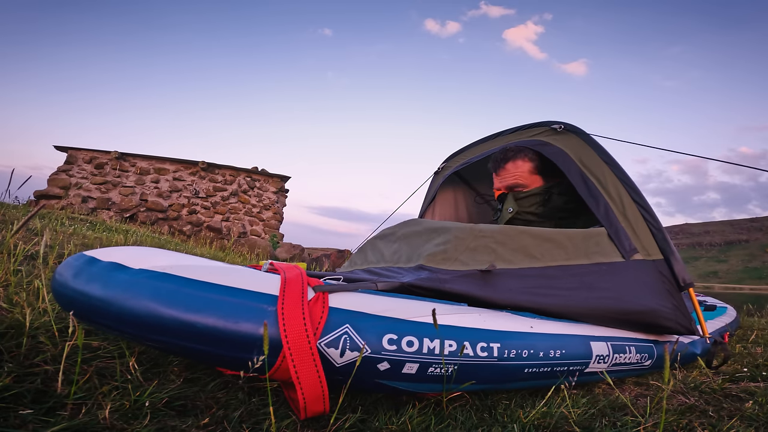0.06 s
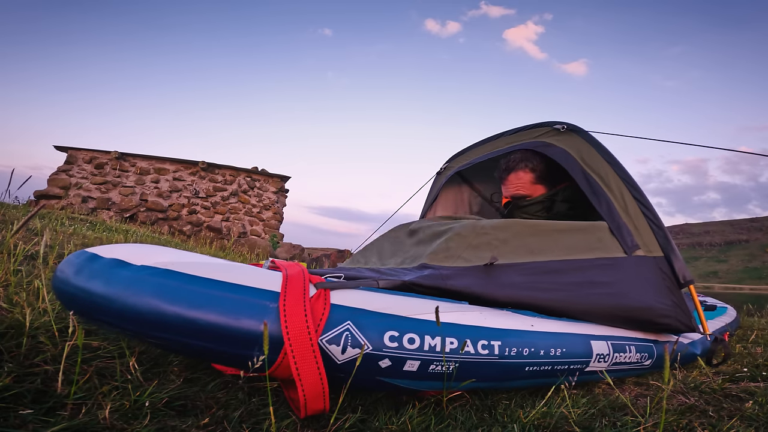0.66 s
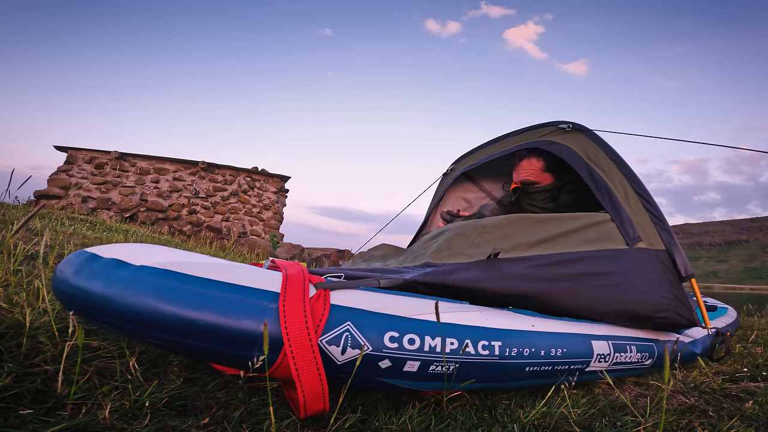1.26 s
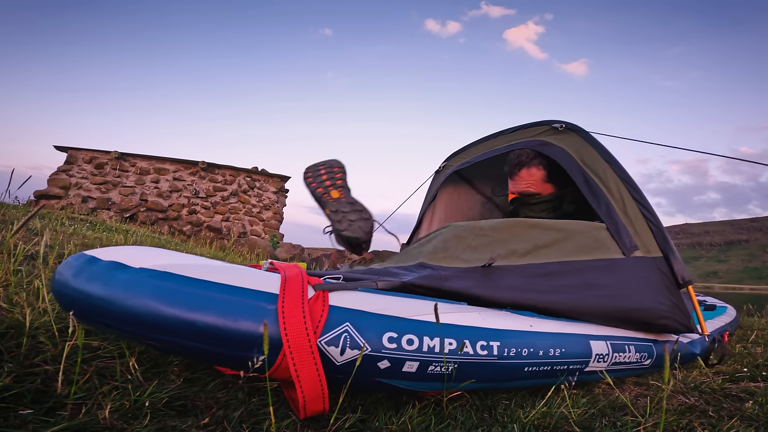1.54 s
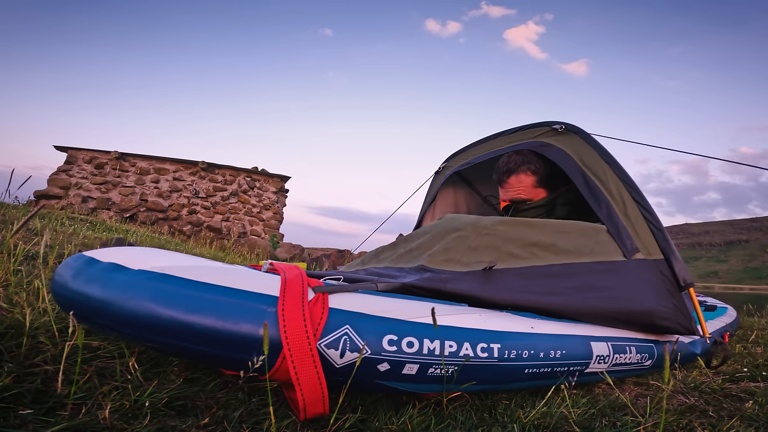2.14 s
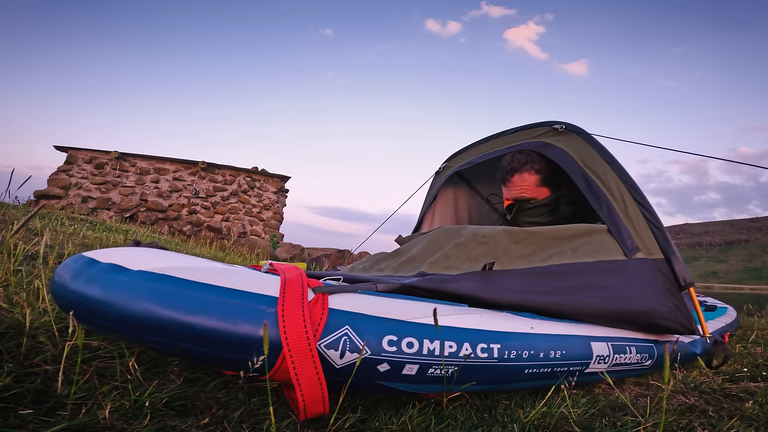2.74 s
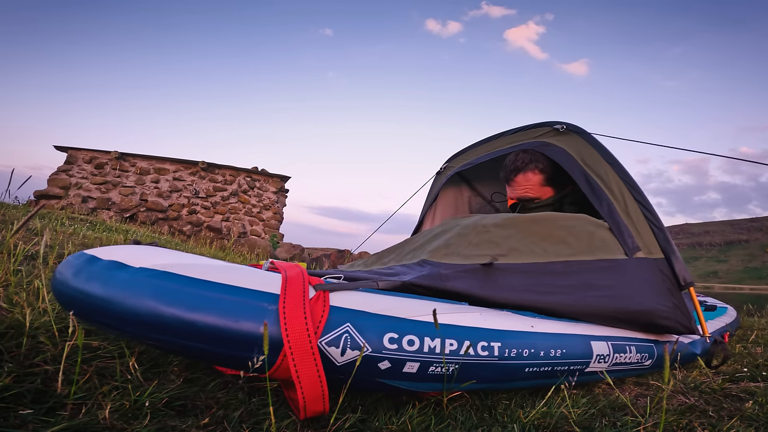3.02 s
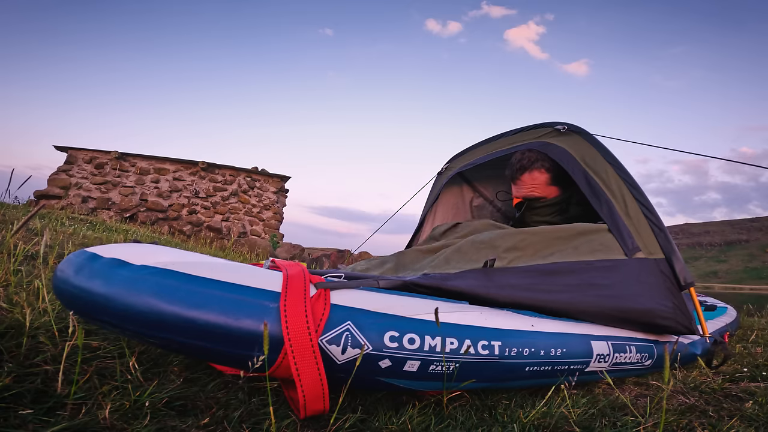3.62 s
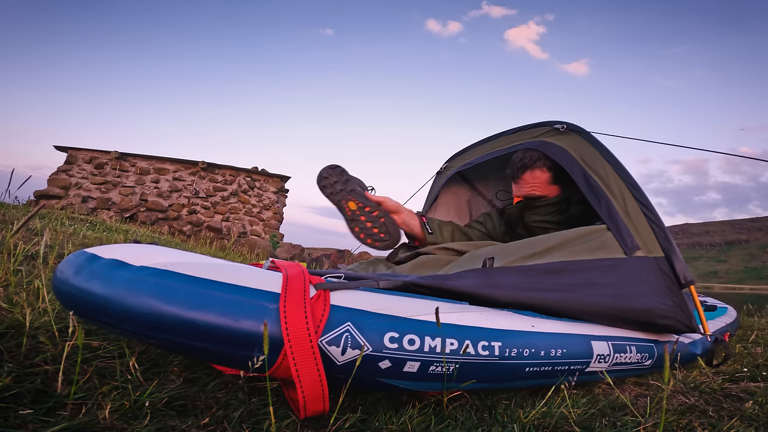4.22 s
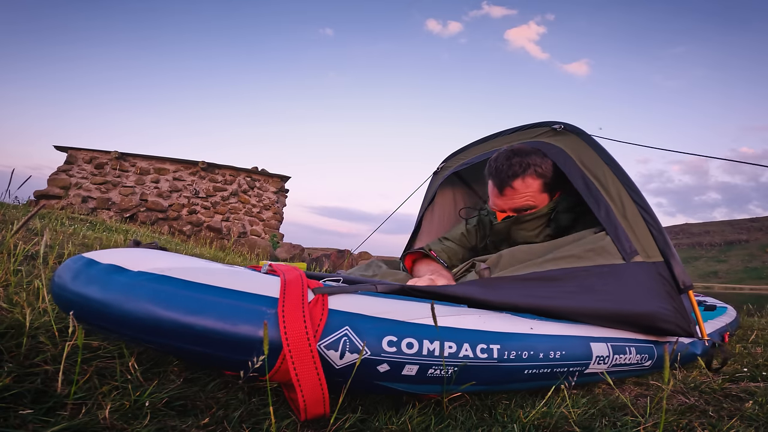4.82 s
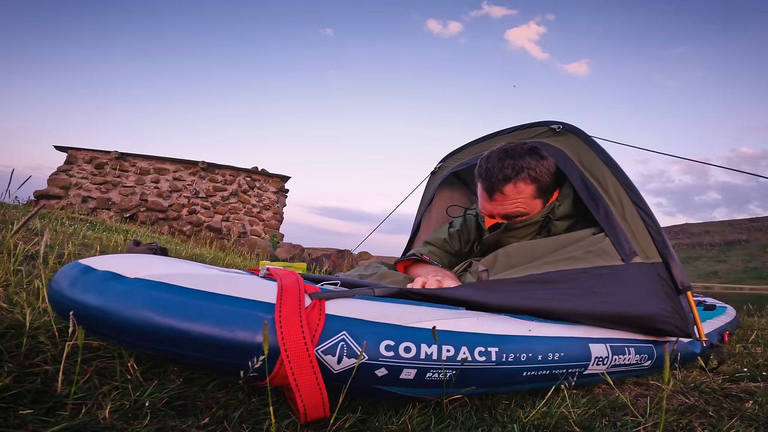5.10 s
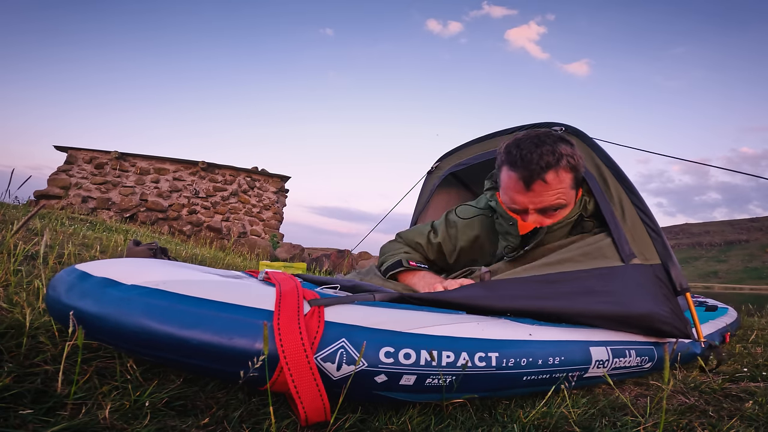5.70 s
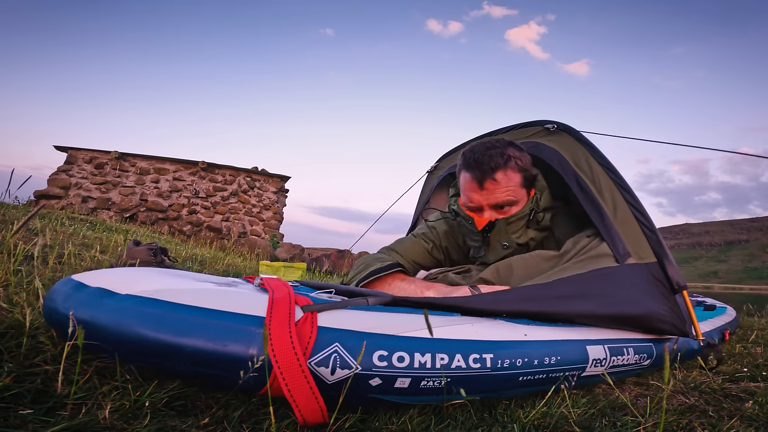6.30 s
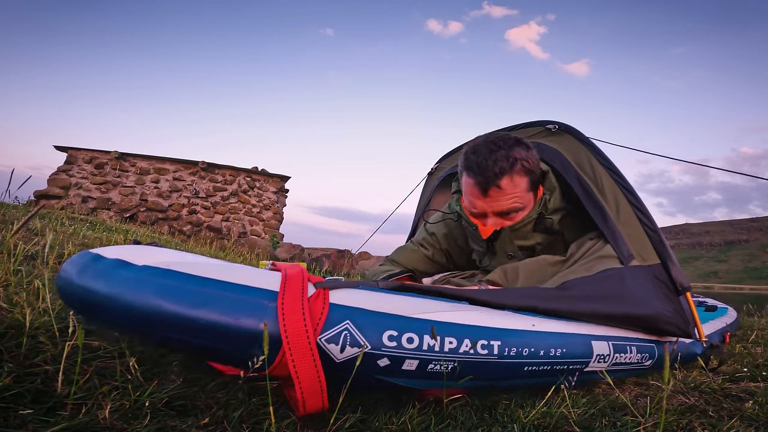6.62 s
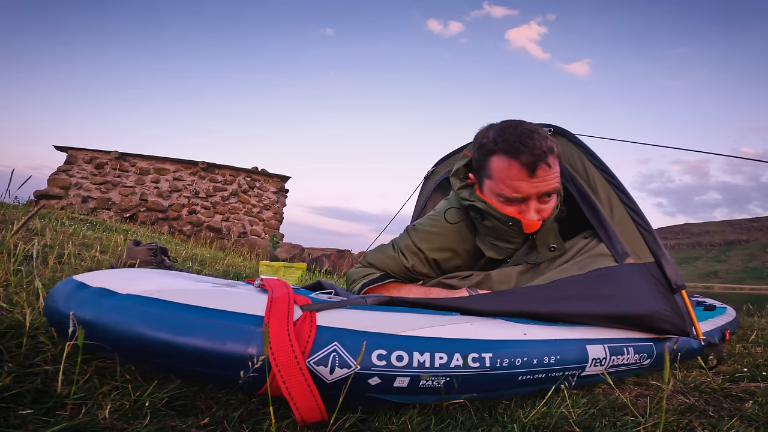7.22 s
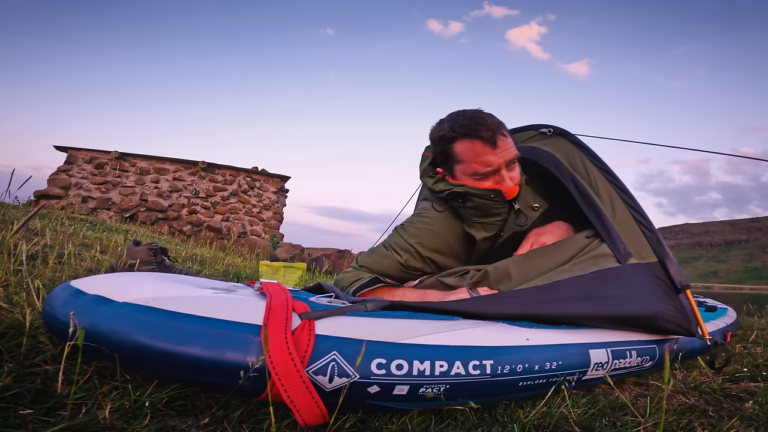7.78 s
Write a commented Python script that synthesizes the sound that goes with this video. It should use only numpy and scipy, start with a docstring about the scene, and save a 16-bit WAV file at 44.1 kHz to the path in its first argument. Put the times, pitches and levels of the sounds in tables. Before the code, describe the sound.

Close to the microphone, in still open air, nylon swishes, scrapes and billows as a person works free of a small shelter. Two boots are thrown out about three seconds apart, each landing with a slap and a dull thud. The rustling grows stronger, a sharp crack comes with a low knock on the taut inflatable board, and a few softer elbow bumps follow before the cloth quietens.

```python
"""Nylon slides, crinkles and flaps close by: someone wriggles out of a bivvy bag on an inflatable board.
Each pull or shove drags the cloth into hiss; folds pop and squeak, and the bag billows.
Tossed boots land with a slap and a thud; elbows bump the taut paddle board and ring its low modes.
Outdoors: no echoes, only faint open air behind."""
import sys
import numpy as np
from scipy import signal
from scipy.fft import rfft, irfft, next_fast_len
from scipy.io import wavfile
from scipy.ndimage import uniform_filter1d

SR = 44100
rng = np.random.default_rng(int(sys.argv[2]) if len(sys.argv) > 2 else 0)


def unload_wav(signal):
    """Save mono or channel-first audio to the path in sys.argv[1] as 16-bit WAV at rate SR, clipped to [-1, 1]."""
    wavfile.write(
        sys.argv[1],
        SR,
        np.round(np.clip(np.atleast_2d(signal).T, -1, 1) * 32767).astype(np.int16),
    )


N = 350595
TIME = np.arange(N) / SR
MS = 1e-3


def undb(db):
    """Decibels to gain."""
    return 10 ** (np.asarray(db) / 20)


def unit(x):
    """Scale to rms 1."""
    return x / np.sqrt(np.mean(x ** 2))


def peak(x):
    """Scale to peak 1."""
    return x / np.abs(x).max()


def colour(x, points, tilt_db_per_oct=0):
    """Filter by (freq_hz, gain_db) points, tilted about 1 kHz."""
    size = next_fast_len(x.shape[-1])
    hz, db = np.transpose(points)
    octave = np.log2(np.maximum(np.fft.rfftfreq(size, 1 / SR), 10))
    gain = undb(np.interp(octave, np.log2(hz), db) + tilt_db_per_oct * (octave - np.log2(1000)))
    return irfft(rfft(x, size) * gain, size)[..., :x.shape[-1]]


def band(x, hz, q):
    """One resonance."""
    return signal.lfilter(*signal.iirpeak(min(hz, SR / 3), max(q, .5), fs=SR), x)


def walk(rate_hz):
    """Smooth random drift, rms 1."""
    hold = max(int(SR / rate_hz), 1)
    steps = np.repeat(rng.standard_normal(N // hold + 1), hold)[:N]
    return unit(uniform_filter1d(steps, hold))


def swell(start_s, length_s, crest, power):
    """Envelope 0-1-0, peaking at the fraction crest of its length."""
    corners_s = [start_s, start_s + length_s * np.clip(crest, .05, .95), start_s + length_s]
    return np.sin(np.pi / 2 * np.interp(TIME, corners_s, [0, 1, 0])) ** power


def add(track, start_s, sound):
    """Mix a sound into a track."""
    i = int(start_s * SR)
    track[..., i:i + sound.shape[-1]] += sound[..., :N - i]


def spread(mid, side, side_db):
    """Mid and side to left and right."""
    return mid + undb(side_db) * side * np.array([[1], [-1]])


def friction(speed_power=1.135):
    """Hiss, sheen, rasp and rub gains follow sliding speed; overlapping strokes add in power."""
    # arm pulls, body shoves: start_s, length_s, crest_fraction, level_db, sheen_rel_db, rasp_rel_db, rub_db
    strokes = [(0.083, 0.28, 0.55, -46, -5, -10.5, -59), (0.256, 0.56, 0.34, -56.5, -8.5, -10.5, -70),
               (0.574, 0.11, 0.8, -42, -13, -15, -56.5), (.66, .16, 0.33, -41.5, -4, -15, -53),
               (0.752, 0.27, 0.43, -37, -9, -6, -52), (0.925, .17, 0.43, -40, -10.5, -7.5, -51),
               (1.054, .22, 0.49, -51, -8, -17, -61), (1.274, 0.32, 0.55, -49, -7, -10, -63),
               (1.517, 0.27, 0.77, -43, -6, -12, -57.5), (1.746, 0.36, 0.29, -43.5, -9, -10, -51),
               (2.006, 0.21, 0.25, -46.5, -9, -5, -53), (2.144, 0.32, 0.23, -55, -6, -4, -56.5),
               (2.472, .14, 0.82, -49, -8, -5, -57), (2.58, 0.2, 0.93, -55.5, -11, -9, -66),
               (2.875, .25, 0.83, -42, -8.5, -8, -56), (3.041, 0.25, 0.74, -41, -9, -18.5, -58),
               (3.237, 0.29, 0.074, -42.5, -14.5, -5, -55), (3.482, .26, 0.83, -41, -13, -11.5, -52),
               (3.709, 0.26, 0.37, -44, -9, -14.5, -58), (3.928, 0.08, 0.17, -51, -5, -25, -58),
               (4.119, 0.12, 0.51, -48, -3.5, -33, -71), (4.176, .11, 0.78, -48, -5, -33, -83),
               (4.23, 0.39, 0.61, -48.5, -8, -13, -63), (4.478, 0.49, 0.28, -43, -9, -7.5, -48.5),
               (4.828, 0.27, 0.54, -49, -2.5, -7.5, -53.5), (5.05, 0.21, 0.31, -51.5, -4.5, -7, -49.5),
               (5.116, 0.86, 0.25, -49.5, -7.5, -8, -53.5), (5.5, 0.44, 0.52, -44.5, -8.5, -8, -57),
               (5.745, 0.4, 0.59, -36, -8.5, -6.5, -49.5), (6.105, 0.24, 0.47, -34.5, -7.5, -5, -42.5),
               (6.286, 0.35, 0.26, -48, -8.5, -11.5, -59), (6.549, 0.36, 0.34, -46, -8, -6, -51),
               (6.748, 0.28, 0.88, -39.5, -11, -6, -48), (6.991, 0.2, 0.36, -38.5, -15.5, -1.5, -45),
               (7.1, 0.49, 0.12, -48, -9, -7.5, -52), (7.354, 0.43, 0.34, -47, -9.5, -6.5, -59),
               (7.582, 0.49, 0.34, -49.5, -8.5, -0.5, -57)]
    rest_db = (-62.5, -68.5, -69, -72.5)  # cloth settling between strokes
    power = undb(rest_db)[:, None] ** 2 * np.ones(N)
    for start_s, length_s, crest, level_db, sheen_rel_db, rasp_rel_db, rub_db in strokes:
        gains = undb([level_db, level_db + sheen_rel_db, level_db + rasp_rel_db, rub_db])
        power += np.outer(gains ** 2, swell(start_s, length_s, crest, speed_power) ** 2)
    return np.sqrt(power)


def fibres(rate_hz, scatter_db, crinkle_db):
    """Smooth friction plus tiny buckles of the cloth, a few much larger than the rest."""
    sizes = undb(scatter_db * np.minimum(rng.exponential(size=N), 5))
    buckles = (rng.random(N) < rate_hz / SR) * sizes * rng.choice([-1, 1], N)
    return unit(rng.standard_normal(N) + undb(crinkle_db) * unit(buckles))


def cloth(hiss_gain, sheen_gain, rasp_gain):
    """Nylon slides in small jerks; changing folds favour one pitch region after another."""
    # spectra of sliding, fast sliding and pressed cloth: freq_hz, gain_db
    hiss_eq = [(530, -27), (900, -21.5), (1250, 0), (1630, 4), (1820, 3), (2140, 2.5), (2970, 0.5),
               (4560, -4), (6050, -19.5), (7000, -26.5), (9100, -20), (15400, -120)]
    sheen_eq = [(3000, -13.5), (5000, -3), (6200, -1.5), (7500, -1), (8300, -7), (9800, -10), (11000, -19),
                (12500, -21), (14500, -39), (16000, -55)]
    rasp_eq = [(250, -2.5), (420, 2), (600, -1.5), (820, -8), (1100, -1), (1700, -11), (3000, -54)]
    jerks_db = 0.97 * walk(45) + 0.36 * walk(220)
    grain = fibres(rate_hz=900, scatter_db=3.5, crinkle_db=-4.5)
    folds = sum(band(grain, hz, q=6) * undb(3 * walk(22)) for hz in np.geomspace(950, 7000, num=16))
    hiss_mid = unit(colour(unit(folds) + 0.64 * grain, hiss_eq))
    hiss = spread(hiss_mid, unit(colour(rng.standard_normal(N), hiss_eq)), side_db=-31)
    sheen_mid = unit(colour(grain, sheen_eq))
    sheen = spread(sheen_mid, unit(colour(rng.standard_normal(N), sheen_eq)), side_db=-12)
    coarse_grain = fibres(rate_hz=250, scatter_db=0.5, crinkle_db=2.5)
    rasp = unit(colour(coarse_grain, rasp_eq)) * undb(2 * walk(30))
    return undb(jerks_db) * (undb(-3.6) * hiss_gain * hiss + sheen_gain * sheen + rasp_gain * rasp)


def board_rub(gain):
    """Cloth dragged over the board makes it murmur."""
    # murmur spectrum: freq_hz, gain_db
    rub_eq = [(50, -6), (95, -20.5), (150, 4.5), (220, 3), (310, -0.5), (420, -10), (600, -21), (1200, -47)]
    grain = fibres(rate_hz=90, scatter_db=3, crinkle_db=-0.5)
    return unit(colour(grain, rub_eq)) * gain * undb(1.85 * walk(25) + 5.5)


def billows(crest=0.33, rest_db=-62):
    """The bag pushes air as it fills and sags under shifting weight."""
    # moving air spectrum: freq_hz, gain_db
    billow_eq = [(10, 9.5), (28, 5.5), (45, 4), (70, -5.5), (105, -5), (220, -60)]
    # fillings of the bag: fullest_s, length_s, level_db
    fills = [(.24, 0.33, -44.5), (0.724, 0.17, -39), (1.145, 0.42, -54), (1.55, 0.59, -59),
             (1.946, 0.5, -37.5), (2.3, 0.69, -47), (2.656, 0.32, -48), (3.35, .6, -55), (3.676, 0.19, -55),
             (4.758, .4, -30.5), (5.557, 0.78, -46.5), (5.997, 0.25, -37), (6.29, 0.21, -41.5),
             (6.724, 0.97, -40), (6.964, 0.13, -32), (7.16, 0.15, -52), (7.5, 0.38, -54)]
    flow = sum(undb(level_db) * swell(fullest_s - crest * length_s, length_s, crest, power=1.8)
               for fullest_s, length_s, level_db in fills)
    return unit(colour(rng.standard_normal(N), billow_eq)) * (flow + undb(rest_db))


def knocks(heave_t60_s=0.13, heave_rise_ms=2.1, spot_db=1):
    """A soft contact rings the low modes (shorter is brighter) while the whole mass heaves briefly."""
    # thuds and bumps: start_s, peak_db, contact_ms, tautness_pitch_ratio, heave_db, heave_hz
    hits = [(.178, -44, 4.3, 1.16, -34, 43.2), (0.992, -31, 0.94, 1.05, -55, 60),
            (1.157, -35.5, 3.5, 1.68, -51, 60), (1.762, -13.5, 4.5, 0.98, -7.5, 60),
            (1.78, -17, 1.8, 0.87, -13.5, 33), (1.805, -17, 13, 0.81, -27, 34),
            (1.819, -30, 0.86, 1.25, -40, 69.6), (1.877, -9, 3.8, 1.14, -20, 60),
            (2.071, -28.5, 1, 1.46, -28.5, 35.3), (2.204, -35, 1.1, 1.65, -50, 49),
            (2.289, -25, 2, 1.32, -24.5, 37.5), (2.363, -24, 1.6, 1.09, -20.5, 55.4),
            (2.4, -32.5, 5.8, 1.33, -29, 39.7), (2.451, -50, 4.6, 0.82, -36, 50.5),
            (2.575, -34.5, 2.6, 0.97, -25, 49.5), (3.222, -30.5, 2.4, 1.28, -55, 60),
            (3.287, -35, 2.4, 0.72, -35, 50.4), (3.386, -36.5, 3, 1.7, -56, 60),
            (3.56, -28, 1.5, 1.18, -55, 60), (3.61, -27.5, 1.6, 1.64, -34.5, 40),
            (3.812, -37, 1.4, 1.26, -58, 60), (4.545, -23.5, 3.3, 0.99, -50, 75),
            (4.632, -17.5, 5.5, 1.26, -46, 70.6), (4.652, -29.5, 4.6, 0.81, -42, 60),
            (4.7427, -6, 1.13, 1.1, -15.5, 87.5), (4.764, -21.5, 5.5, 1.2, -17.5, 35.7),
            (4.796, -21, 1.7, 0.67, -22, 42.2), (5.115, -32, 1.24, 1.03, -42, 60),
            (5.456, -33.5, 6.6, 1.23, -35, 71), (5.857, -24.5, 1.7, 1.16, -34, 60),
            (5.892, -48, 2.9, 1, -28, 60), (6.017, -26.5, 3.3, .9, -46, 60),
            (6.085, -47, 4.4, .87, -32, 66.4), (6.17, -32, 3.5, 1.7, -22.5, 51),
            (6.208, -15, 0.78, 0.74, -18, 70.4), (6.216, -8.5, 2.1, .8, -13.5, 81.4),
            (6.2219, -7, 1.25, 0.93, -11.5, 34), (6.695, -30.5, 4.4, 0.94, -50, 60),
            (6.808, -24.5, 3.4, 1.3, -48, 60), (6.972, -19, 3.4, 0.96, -22, 52),
            (7.043, -24.5, 3.3, 0.99, -52, 70), (7.059, -19.5, 2.7, 0.95, -45, 70),
            (7.084, -23.5, 2.9, 1.33, -42, 70), (7.345, -33, 3.5, 0.86, -34, 64)]
    # board and ground modes: pitch_hz, level_db, t60_s
    modes = [(93.4, -22.5, 0.46), (121.9, -5, 0.15), (155, 2.5, 0.039), (196, -16.5, 0.039),
             (243.5, -2.5, 0.071), (296, -2.5, 0.1), (359, -66, 0.044), (474, -36, 0.15), (567, -12, 0.049),
             (683, -6, 0.045)]
    out, t = np.zeros(N), TIME[:SR // 2]
    mode_hz, mode_db, t60_s = np.transpose(modes)[..., None]
    mode_decay = undb(-60 * t / t60_s)
    heave_envelope = undb(-60 * t / heave_t60_s) * (1 - np.exp(-t / (heave_rise_ms * MS)))
    for start_s, peak_db, contact_ms, tautness, heave_db, heave_hz in hits:
        weights = undb(mode_db + spot_db * rng.standard_normal(mode_hz.shape))  # vary with the spot hit
        ring = np.sum(weights * np.cos(2 * np.pi * mode_hz * tautness * t) * mode_decay, axis=0)
        age = t / (contact_ms * MS)
        push = age ** 2 * np.exp(-4 * age)
        knock = signal.fftconvolve(push, ring)[:len(t)]
        heave = np.sin(2 * np.pi * heave_hz * t) * heave_envelope
        add(out, start_s, undb(peak_db) * peak(knock) + undb(heave_db) * peak(heave))
    return out


def slaps():
    """Many folds collapse together: a burst that swells to the moment of contact and dies away."""
    # cloth slapped or whipped: contact_s, level_db, swell_ms, fade_ms, tilt_db_per_oct
    bursts = [(.28, -41, 4.4, 4.6, 5), (0.725, -37, 19, 27, 10.5), (1.682, -31.5, 0.69, 2.1, 13),
              (1.737, -30.5, 11.5, 25, 8.5), (1.759, -23, 1.3, 20, -2.5), (1.821, -29.5, 3, 7.3, -2),
              (2.068, -40, 13, 18, -6.5), (2.289, -25, .6, 1.9, -8.5), (2.362, -42, 0.89, 30, 1.5),
              (2.414, -43, 3, 4.3, 2.5), (2.721, -50, 5.1, 12, 0.5), (3.678, -37.5, 2.2, 2.7, 7),
              (4.391, -33, 0.39, 2.1, 8.5), (4.674, -31, 2.4, 3.2, -1), (4.708, -33.5, 0.41, 11, 8),
              (4.732, -21, 3.8, 14, 7.5), (4.742, -14, 7, 7.1, -1.5), (4.781, -34.5, 12, 16, 8.5),
              (5.120, -44, 5, 28, 7.5), (5.883, -35.5, 6.2, 12, 9), (6.211, -14, 1.2, 2.6, 0),
              (6.224, -24, 22, 12, 3), (6.283, -42, 11, 7.3, 15), (6.986, -28.5, 0.86, 5.8, 0)]
    # slap spectrum: freq_hz, gain_db
    slap_eq = [(60, 0), (200, 22), (330, 28.5), (700, 17.5), (1200, 13), (2200, 3.5), (4500, -8.5),
               (7500, -18), (10000, -30), (12000, -44), (15000, -55)]
    out, lead = np.zeros((2, N)), SR // 8
    t = TIME[:2 * lead] - TIME[lead]
    for contact_s, level_db, swell_ms, fade_ms, tilt_db_per_oct in bursts:
        mid, side = unit(colour(rng.standard_normal((2, len(t))), slap_eq, tilt_db_per_oct))
        envelope = np.exp(-np.abs(t) / (MS * np.where(t < 0, swell_ms, fade_ms)))
        add(out, contact_s - TIME[lead], undb(level_db) * envelope * spread(mid, side, side_db=-41))
    return out


def snaps(crackle=0.3, top_hz=8000):
    """A crease flips: one sharp pulse with a brief crackle; longer ones are more pitched."""
    # crease pops and small hard taps: start_s, peak_db, centre_hz, decay_ms
    pops = [(.375, -42, 1000, 2), (0.552, -39, 2200, 2.1), (1.248, -41.5, 2500, 2.2),
            (1.275, -42.5, 1500, 2.1), (1.8038, -22.5, 1720, 1.5), (1.825, -28, 1280, 1.7),
            (1.9503, -17, 3070, 1.06), (1.961, -34.5, 750, 2), (2.288, -33.5, 2160, 2),
            (2.858, -45, 6140, 1.1), (3.333, -29, 2480, 1.2), (3.813, -32, 2080, 2.3),
            (4.305, -35, 3000, 2.5), (4.3895, -26.5, 3000, 0.61), (4.415, -30, 1870, 2.4),
            (5.636, -33, 1040, 2.5), (5.685, -33.5, 870, 3.5), (5.699, -33.5, 820, 3.7),
            (5.734, -31, 1000, 3.2), (6.194, -7.5, 2820, 1.05), (6.2045, -15, 2500, 2.5),
            (6.588, -33, 3420, 2.5), (6.986, -24.5, 1830, 2.4), (6.991, -23, 2000, 2.6),
            (7.220, -23, 2600, 2.3), (7.8481, -29.5, 1110, 4.6)]
    out, t = np.zeros(N), TIME[:SR // 20]
    lowpass = signal.butter(3, top_hz, fs=SR)
    for start_s, peak_db, centre_hz, decay_ms in pops:
        crack = (t == 0) + crackle * rng.standard_normal(len(t)) * np.exp(-t / (decay_ms * MS))
        pitched = band(crack, centre_hz, q=.3 + .8 * decay_ms)
        add(out, start_s, undb(peak_db) * peak(signal.lfilter(*lowpass, pitched)))
    return out


def squeaks(jitter=0.125):
    """A taut fold sticks and slips at an unsteady rate: a hoarse, half-pitched chirp."""
    # rubbing folds: middle_s, length_s, level_db, pitch_hz, glide_oct_per_s
    chirps = [(0.205, 0.098, -51, 1600, 0), (0.466, 0.055, -58, 1630, 5), (0.507, 0.036, -52, 1640, -4),
              (0.66, 0.065, -56.5, 747, -4.5), (0.907, 0.083, -43.5, 626, -3.5),
              (0.992, 0.087, -45, 399.5, -3.5), (1.247, 0.065, -56.5, 500, 4.5),
              (2.242, .08, -59, 646, 5.5), (3.832, 0.17, -50.5, 2020, 1), (3.973, 0.059, -57, 1800, -10),
              (7.106, 0.16, -40.5, 2200, -4)]
    out = np.zeros(N)
    for middle_s, length_s, level_db, pitch_hz, glide_oct_per_s in chirps:
        t = TIME[:int(length_s * SR)] - length_s / 2
        slip_hz = pitch_hz * 2 ** (glide_oct_per_s * t) * (1 + jitter * walk(pitch_hz / 2)[:len(t)])
        grip = np.hanning(len(t)) * undb(4.7 * walk(300)[:len(t)])
        tone = unit(np.sin(2 * np.pi * np.cumsum(slip_hz) / SR))
        add(out, middle_s - length_s / 2, undb(level_db) * grip * tone)
    return out


def scrape(jitter=0.08):
    """An edge skips unevenly over the threads, faster and faster: a rough rising zip."""
    # path across the weave: time_s, thread_rate_hz, level_db
    path = [(.47, 350, -62), (.494, 414, -62), (.508, 940, -50), (.521, 1240, -47), (.533, 1760, -51),
            (.546, 2100, -53)]
    time_s, thread_rate_hz, level_db = np.transpose(path)
    skip_hz = np.interp(TIME, time_s, thread_rate_hz) * (1 + jitter * walk(1000))
    phase = 2 * np.pi * np.cumsum(skip_hz) / SR
    envelope = undb(np.interp(TIME, time_s, level_db)) * (TIME > time_s[0]) * (TIME < time_s[-1])
    grip = undb(3 * walk(500))
    return envelope * unit(grip * (np.sin(phase) + .35 * np.sin(2 * phase)))


def open_air():
    """A faint, even, wide hush."""
    # outdoor air spectrum: freq_hz, gain_db
    air_eq = [(20, 11), (80, -10), (300, -8.5), (800, -20), (1500, -12), (4000, -37), (8000, -43),
              (12000, -50), (15000, -70)]
    mid, side = unit(colour(rng.standard_normal((2, N)), air_eq))
    return undb(-73) * spread(mid, side, side_db=9.5)


def microphone(sound):
    """Each of the two ports hears the sound with its own level and phase."""
    # left port relative to right: freq_hz, balance_db, lead_rad
    ports = [(60, 0.9, -0.045), (240, -1, 0.17), (500, -2.5, -0.27), (1000, -4.5, -0.1),
             (2000, -2.5, -0.39), (3000, -3.5, -0.77), (5000, -2.6, -0.56), (7960, -1, 0.036),
             (11800, 0.8, -1.2)]
    size = next_fast_len(N)
    freq_hz, *columns = np.transpose(ports)
    balance_db, lead_rad = (np.interp(np.fft.rfftfreq(size, 1 / SR), freq_hz, c) for c in columns)
    share = np.array([[.5], [-.5]])
    response = undb(share * balance_db) * np.exp(1j * share * lead_rad)
    return irfft(rfft(sound, size) * response, size)[:, :N]


def scene():
    """All sources, heard a little to the right."""
    hiss_gain, sheen_gain, rasp_gain, rub_gain = friction()
    wriggling = cloth(hiss_gain, sheen_gain, rasp_gain) + board_rub(rub_gain) + billows()
    return microphone(wriggling + knocks() + slaps() + snaps() + squeaks() + scrape() + open_air())


def record(dry):
    """Block the slowest air movement and cut the top."""
    low_hz, top_hz = 10, 15000
    dry = signal.sosfilt(signal.butter(1, low_hz, "high", fs=SR, output="sos"), dry)
    return signal.sosfilt(signal.ellip(8, .2, 70, top_hz, fs=SR, output="sos"), dry)


dry = scene()
out = record(dry)
unload_wav(out)
```